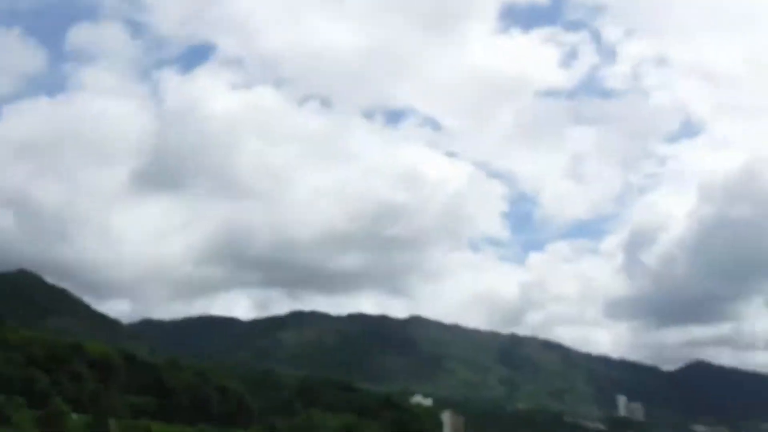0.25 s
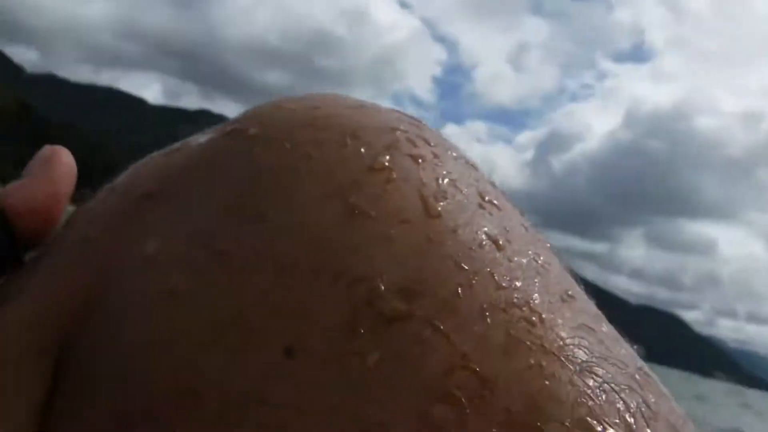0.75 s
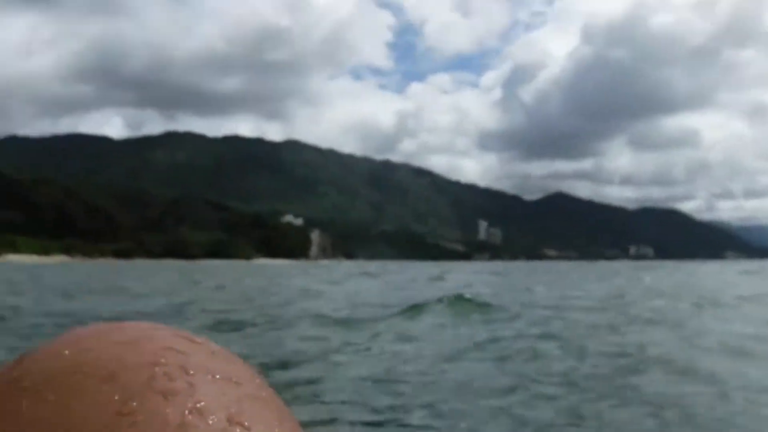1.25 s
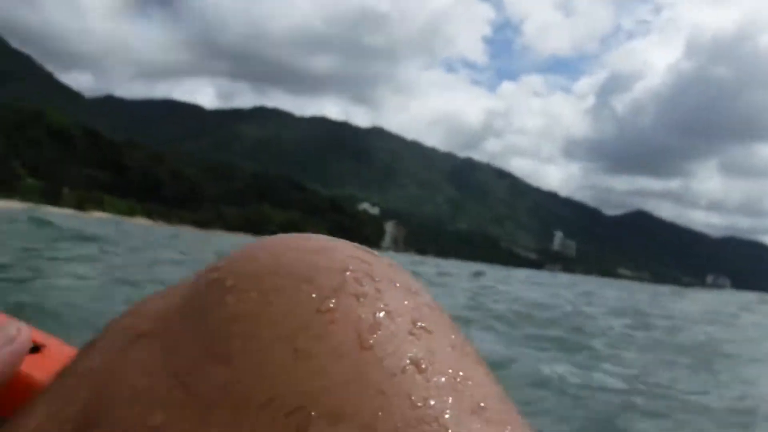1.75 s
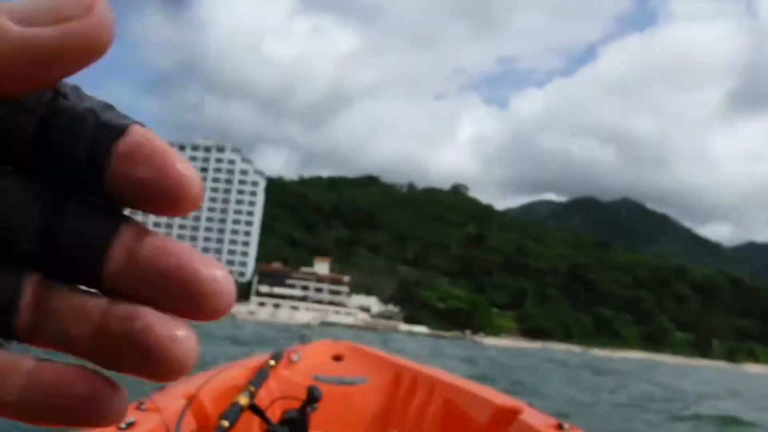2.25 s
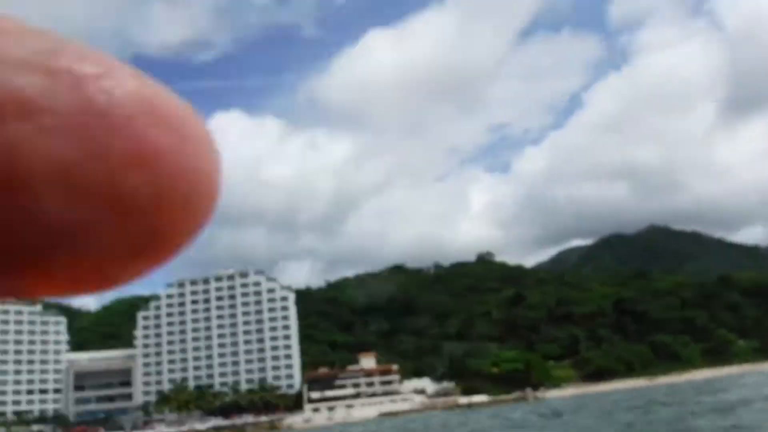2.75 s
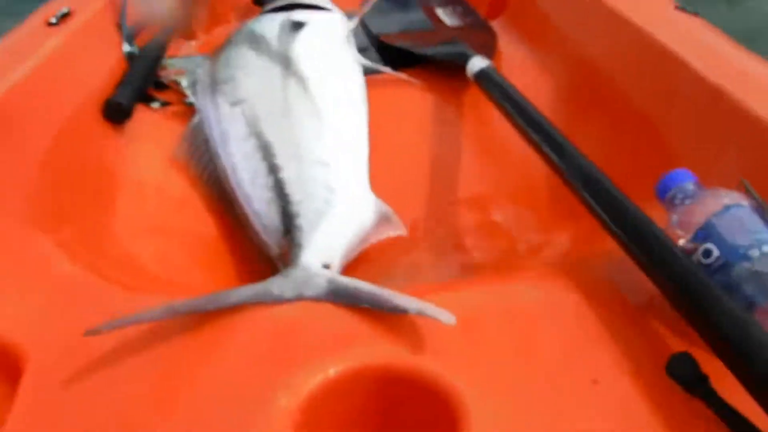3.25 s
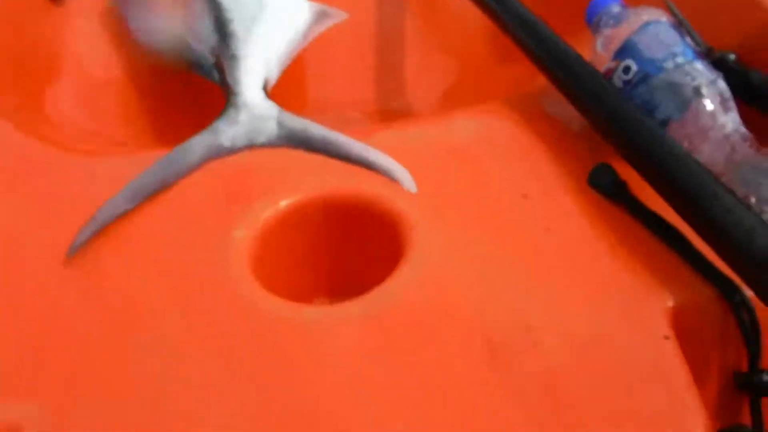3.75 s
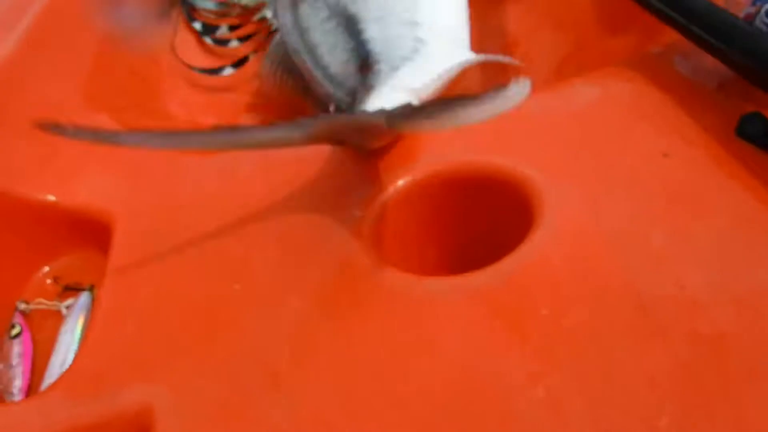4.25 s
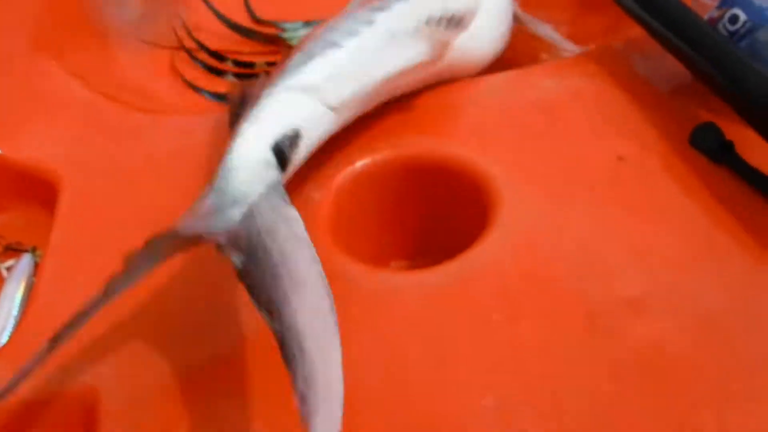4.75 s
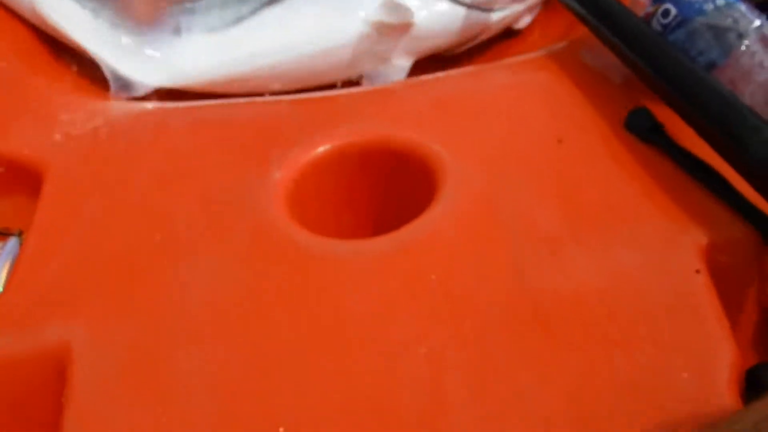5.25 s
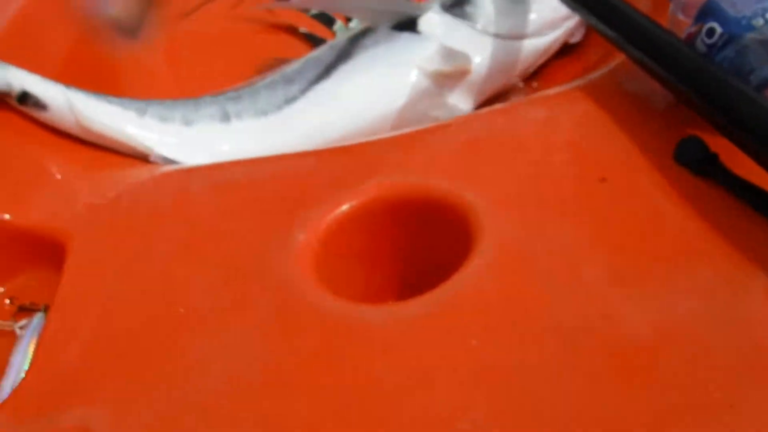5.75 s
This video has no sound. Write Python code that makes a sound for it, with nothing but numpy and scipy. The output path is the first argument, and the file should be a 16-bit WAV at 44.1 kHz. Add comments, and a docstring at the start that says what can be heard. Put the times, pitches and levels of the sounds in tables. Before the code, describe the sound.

Outdoors on open water, a close handheld microphone in a plastic case picks up soft muffled slosh, a far wash, small bubbles and low, gusty wind. Around 0.9-1.3 s a wavelet knocks the hollow kayak hull, with little glugs and a small splash. Quiet lapping continues until 2.6 s, when skin rubs the case and wind buffets low. Short, dull taps ring at 2.83 s, with ticks near 3.0 s. At about 3.15 s one very loud, deep thump shudders, rattles and distorts, leaving a short rumble. From 3.6 s a fish drags over the deck amid gritty finger rubs, a sharp tick at 3.86 s and hollow knocks, peaking in a hard double slap near 4.58 s. Another solid knock lands at 5.02 s, a lighter one at 5.39 s, then tiny wet fizzes, a tick at 5.5 s and faint rubs fade into water by 6 s.

```python
"""A hollow kayak hull knocks as wavelets slap it and a fish is dragged and dropped on its deck: struck modes.
Around it, coloured noise makes the slosh, the far wash and a light, gusty wind; damped tones make the glugs.
Fingers rub, tap and tick on a hand-held waterproof camera: gritty noise, short rings and snaps.
One heavy bump, a deep shudder with a gliding pitch, rings the case, shakes the hull and overloads the microphone."""
import sys
import numpy as np
from scipy import signal
from scipy.fft import rfft, irfft, next_fast_len
from scipy.io import wavfile
from scipy.ndimage import uniform_filter1d

SR = 44100
rng = np.random.default_rng(int(sys.argv[2]) if len(sys.argv) > 2 else 0)


def store_pcm(level_fs):
    """Save levels as 16-bit WAV."""
    pcm = np.round(np.clip(level_fs, -1, 1) * 32767).astype(np.int16)
    wavfile.write(sys.argv[1], SR, np.atleast_2d(pcm).T)


N = 265173
TIME = np.arange(N) / SR


def amp(db):
    """Decibels to gain."""
    return 10 ** (np.asarray(db) / 20)


def unit(x):
    """Scales to an rms of one."""
    return x / np.sqrt(np.mean(x ** 2) + 1e-20)


def level(curve):
    """Gain over time from rows (time [s], level [dB])."""
    return amp(np.interp(TIME, *np.transpose(curve)))


def swell(middle_s, half_s):
    """A smooth rise to one at the middle, and a smooth fall."""
    return np.exp(-((TIME - middle_s) / half_s) ** 2 / 2)


def add(mix, start_s, sound):
    """Mixes a sound in at its start time."""
    part = mix[max(round(start_s * SR), 0):][:len(sound)]
    part += sound[:len(part)]


def cut(x, hz, kind, order):
    """Low-pass or high-pass filter."""
    sos = signal.butter(order, min(hz, SR / 2 - 1), kind, fs=SR, output="sos")
    return signal.sosfilt(sos, x)


def colour(x, points, tilt_db=0):
    """Shapes x by rows (frequency [Hz], level [dB]), tilted in dB per octave, at an rms of one."""
    size = next_fast_len(len(x))
    octave = np.log2(np.fft.rfftfreq(size, 1 / SR) + 1)
    hz, db = np.transpose(points)
    gain = amp(np.interp(octave, np.log2(hz), db) + tilt_db * octave)
    return unit(irfft(rfft(x, size) * gain, size)[:len(x)])


def churn(patchy_db, size):
    """Noise whose strength drifts in patches of time (size, in 128-sample steps) and pitch."""
    real, imag, patches = rng.standard_normal((3, N // 128 + 5, 257))
    patches = uniform_filter1d(patches, size, 0)
    patches = unit(uniform_filter1d(patches, size=5, axis=1))
    spectrum = (real + 1j * imag) * amp(patchy_db * patches)
    return signal.istft(spectrum.T, nperseg=512, noverlap=384)[1][:N]


def grains(per_s, spread_db):
    """Random clicks, mostly small and a few large."""
    struck = rng.random(N) < per_s / SR
    sign = rng.choice([-1, 1], N)
    return struck * sign * amp(spread_db * np.minimum(rng.exponential(1, N), 3))


def rings(rows, rough):
    """Damped tones (time [s], level [dB], ring [Hz], rise [ms], decay [ms]); sudden ones are noisier."""
    out, t = np.zeros(N), TIME[:SR // 10]
    ms = 1000 * t
    for s, db, hz, rise, decay in rows:
        scuff = cut(rng.standard_normal(len(t)), hz / 2, "high", order=1)
        scuff = unit(cut(scuff, 0.96 * hz, "low", order=3))
        tone = np.sin(2 * np.pi * hz * t) + rough * np.exp(-rise ** 2 / 2) * scuff
        envelope = (1 - np.exp(-ms / rise)) ** 2 * np.exp(-ms / decay)
        add(out, s, amp(db) * envelope * tone)
    return out


# gusts: (strongest at [s], half length [s], level [dB])
GUST_SWELLS = [(0.082, 0.11, -37), (2.48, .22, -35.5), (3.16, .15, -33.5), (4.5, 0.6, -34.5),
               (5.7, 0.5, -42.5)]
# spectrum of wind on the microphone: (frequency [Hz], density [dB per Hz])
WIND_SPECTRUM = [(12, -14), (35, 4), (55, -2.5), (85, -2), (150, -3), (220, -6.5), (400, -39),
                 (1000, -65.5)]
# low pushes of gusts and of the grip, and the strong first push of the bump:
# (middle [s], peak [dB], pitch [Hz])
LOW_PUSHES = [(2.45, -22, 90), (2.521, -18.5, 125), (2.623, -18.5, 98.4), (2.75, -20, 102),
              (2.854, -14.5, 130), (3.125, -15, 92), (3.151, 3, 66), (3.689, -14.5, 135),
              (3.863, -11.5, 172), (3.93, -17, 146)]
BREEZE_DB, BREEZE_TILT_DB = -50, 3  # level, and tilt per octave: the breeze is less deep than the gusts


def wind():
    """Lumpy rumble of a steady breeze and its gusts, with single low pushes of gusts, grip and bump."""
    eddies = churn(patchy_db=3.0, size=10)
    gusts = sum(amp(db) * swell(s, half) for s, half, db in GUST_SWELLS)
    breeze = amp(BREEZE_DB) * colour(eddies, WIND_SPECTRUM, BREEZE_TILT_DB)
    out = breeze + gusts * colour(eddies, WIND_SPECTRUM)
    for s, db, hz in LOW_PUSHES:
        turns = np.arange(-2, 2, hz / SR)
        push = np.cos(2 * np.pi * turns) * np.exp(-(turns / 0.5) ** 2)
        add(out, s - 2 / hz, amp(db) * push)
    return out


# slosh around the hull, before its lift and lapping: (time [s], level [dB])
SLOSH_LEVEL = [(0.0, -43.5), (1.24, -40), (1.42, -44.5), (2.88, -38.5), (3.45, -45.5), (4.55, -37),
               (4.75, -39.5), (6.01, -48)]
# spectrum of the slosh: (frequency [Hz], density [dB per Hz])
SLOSH_SPECTRUM = [(40, -2), (120, -3.5), (290, 1.5), (450, -4.5), (600, -11), (800, -16.5), (1100, -18.5),
                  (1600, -21.5), (3000, -49.5), (6000, -106)]
# open sea, coloured by the microphone's membrane: (frequency [Hz], density [dB per Hz])
SEA_SPECTRUM = [(200, -3.5), (900, -7), (1130, -2), (1300, 8.5), (1460, 7), (1700, -15), (1950, -9.5),
                (2250, -24), (2650, -12.5), (3300, -26.5), (4300, -29), (5500, -86.5)]
# air pockets that wavelets trap under the hull: (time [s], level before rise and decay [dB], ring [Hz], decay [ms])
AIR_GLUGS = [(1.054, -18, 560, 2), (1.160, -17.5, 488, 14), (1.162, -18.5, 351, 13.5),
             (1.331, -24.5, 760, 2.4), (1.472, -24, 777, 5.5)]
SLOSH_LIFT_DB, SEA_DB, BUBBLES_DB = 3.0, -47.5, -56
GLUG_RISE_MS = 0.73
LAP_DB, LAP_HZ = 1.0, 7.1  # depth and fastest pace of the irregular lapping


def water():
    """Near slosh and far wash as patchy noise, ringing air pockets, and small bubbles that rise in pitch."""
    slosh = level(SLOSH_LEVEL) * colour(churn(patchy_db=0.5, size=16), SLOSH_SPECTRUM) * amp(SLOSH_LIFT_DB)
    wash = amp(SEA_DB) * colour(churn(patchy_db=1.3, size=24), SEA_SPECTRUM)
    t, bubbles = TIME[:SR // 25], np.zeros(N)
    for hz in np.geomspace(450, 2900, num=14):
        pop = np.sin(2 * np.pi * hz * t * (1 + 2 * t)) * np.exp(-hz * t / 1.8) / hz
        bubbles += signal.oaconvolve(grains(per_s=5, spread_db=5.5), pop)[:N]
    glugs = rings([(s, db, hz, GLUG_RISE_MS, decay) for s, db, hz, decay in AIR_GLUGS], rough=1.0)
    lapping = amp(LAP_DB * unit(cut(rng.standard_normal(N), LAP_HZ, "low", order=2)))
    return lapping * (slosh + wash) + glugs + amp(BUBBLES_DB) * unit(bubbles)


# beside the boat and on its wet deck: (middle [s], half length [s], level [dB], centre [Hz])
SMALL_SPLASHES = [(0.535, 0.0037, -50.5, 2570), (0.861, 0.009, -46, 2590), (0.878, 0.028, -42, 826),
                  (1.167, 0.053, -42, 514), (1.824, 0.035, -40, 520), (2.28, 0.13, -55, 1950),
                  (5.4, 0.011, -41.5, 2560), (5.478, 0.018, -44, 2330)]


def splashes():
    """Each splash is a brief, narrow-pitched cloud of tiny bubbles."""
    out, fizz = np.zeros(N), grains(per_s=2800, spread_db=9.5)
    for s, half, db, hz in SMALL_SPLASHES:
        near = abs(TIME - s) < 3 * half
        band = [(hz / 2, -22), (hz * 0.74, -2), (hz * 1.06, 0), (hz * 1.41, -19), (hz * 4, -45)]
        out[near] += amp(db) * colour(fizz[near], band) * swell(s, half)[near]
    return out


# taps, a squeak and the heavy bump, all ringing the camera case:
# (time [s], level before rise and decay [dB], ring [Hz], decay [ms])
CASE_RINGS = [(2.803, -10, 1410, 0.91), (2.830, 6, 1438, 3.96), (2.849, 1.5, 1357, 2.9),
              (2.896, -17, 1360, 2.4), (3.020, -3.5, 1200, 2.3), (3.1028, 7, 1056, 1.05),
              (3.1178, 1, 1280, 2.25), (3.137, 1, 1035, 4.4), (3.149, 24, 1196, 1.32),
              (3.1599, 30, 1102, 3.42), (3.1814, 30.5, 1588, 1.13)]
# dry ticks of plastic and fingernails, and the crack of a wavelet's knock on the hull:
# (time [s], level before decay [dB], centre [Hz])
DRY_TICKS = [(1.158, -37, 3770), (3.0213, -19, 7440), (3.022, -11, 2890), (3.089, -31.5, 7000),
             (3.136, -25, 11550), (3.248, -30, 7800), (3.258, -30.5, 3970), (3.857, -14, 8200),
             (4.3098, -36.5, 6100), (5.4923, -24, 6600)]
# strokes of skin on the case: (middle [s], half length [s], level [dB])
SKIN_RUBS = [(2.647, 0.011, -38), (2.738, 0.018, -33.5), (2.777, .006, -35.5), (2.882, 0.041, -39),
             (3.005, 0.03, -38), (3.142, 0.0045, -29.5), (3.199, 0.026, -40), (3.526, 0.012, -46.5),
             (3.599, 0.026, -34), (3.692, 0.033, -40), (3.783, 0.021, -35.5), (3.848, 0.017, -30),
             (3.994, 0.0091, -37), (4.061, .027, -38), (4.145, 0.015, -42), (4.223, .015, -40),
             (4.695, 0.017, -45), (4.863, .025, -45), (4.95, .028, -46), (5.047, 0.023, -41),
             (5.632, 0.03, -43.5), (5.75, .028, -40), (5.865, 0.014, -47)]
# spectrum of skin on the case, before any tilt: (frequency [Hz], density [dB per Hz])
SKIN_SPECTRUM = [(300, -3.5), (1300, 14), (2000, 8), (3200, 4), (4400, 3), (6600, -4.5), (8000, -11),
                 (11000, -18), (16000, -27.5)]
RING_RISE_SHARE = 0.43  # rise over decay: a soft fingertip both builds and fades slowly
TICK_DECAY_S = 0.001
RUB_TILT_DB, RUB_USUAL_DB = 1, -38  # tilt per octave of a usual stroke, and its level
RUB_TILT_PER_DB = 0.47  # harder strokes are brighter
RESTLESS_S, RESTLESS_HALF_S, RESTLESS_DB = 4.04, 1, -58  # faint creep of the grip: middle, half length, level


def case_and_fingers():
    """Skin grips and slips with a gritty hiss; taps, a squeak and the bump ring the case; ticks are dry snaps."""
    out = rings([(s, db, hz, RING_RISE_SHARE * decay, decay) for s, db, hz, decay in CASE_RINGS], rough=0.51)

    grip = amp(2.2 * unit(cut(rng.standard_normal(N), 90, "low", order=2)))
    grit = 1.03 * unit(grains(per_s=1500, spread_db=1.5))
    friction = grip * (unit(churn(patchy_db=4.0, size=12)) + grit)
    creep = colour(grains(per_s=500, spread_db=3.5), SKIN_SPECTRUM)
    out += amp(RESTLESS_DB) * swell(RESTLESS_S, RESTLESS_HALF_S) * creep
    for s, half, db in SKIN_RUBS:
        near = abs(TIME - s) < 3 * half
        stroke = np.exp(-abs((TIME[near] - s) / half) ** 2.22 / 2)
        tilt_db = RUB_TILT_DB + RUB_TILT_PER_DB * (db - RUB_USUAL_DB)
        out[near] += amp(db) * stroke * colour(friction[near], SKIN_SPECTRUM, tilt_db)

    t = TIME[:SR // 16]
    for s, db, hz in DRY_TICKS:
        band = [(hz / 4, -20), (hz * 0.8, -9), (hz, 0), (hz * 1.06, -12),
                (hz * 1.5, -20), (hz * 1.63, -11), (hz * 2, -24), (hz * 4, -44)]
        snap = colour(rng.standard_normal(len(t)), band)
        add(out, s, amp(db) * snap * np.exp(-t / TICK_DECAY_S))
    return out


BUMP_S, BUMP_DB, BUMP_RISE_S, BUMP_FALL_S = 3.1775, 19.5, 0.0135, 0.011
BUMP_SLACK_HZ, BUMP_TAUT_HZ = 133.6, 188.4  # the harder the shudder, the higher its pitch
BUMP_TAIL_DB, BUMP_TAIL_T60_S = -4.5, 0.12
RATTLE_DB, RATTLE_HZ = -1.5, 600  # the case rattles while it is shaken
RUMBLE_DB, RUMBLE_HZ, RUMBLE_T60_S = -17, 60, 0.67  # and rumbles as the grip settles


def bump():
    """A heavy blow shakes the whole camera in a short, deep shudder that rattles the case and leaves a rumble."""
    t = TIME - BUMP_S
    after = t >= 0
    force = swell(BUMP_S, np.where(t < 0, BUMP_RISE_S, BUMP_FALL_S))
    tail = after * amp(BUMP_TAIL_DB - 60 * abs(t) / BUMP_TAIL_T60_S)
    pitch_hz = BUMP_SLACK_HZ + (BUMP_TAUT_HZ - BUMP_SLACK_HZ) * force ** 0.7
    turns = np.cumsum(pitch_hz) / SR
    turns_at_bump = np.interp(BUMP_S, TIME, turns)
    shudder = (amp(BUMP_DB) * force + tail) * np.sin(2 * np.pi * (turns_at_bump - turns))
    rattle = force * amp(RATTLE_DB) * unit(cut(rng.standard_normal(N), RATTLE_HZ, "low", order=2))
    settle = swell(BUMP_S, BUMP_RISE_S) * (t < 0) + after * amp(-60 * abs(t) / RUMBLE_T60_S)
    rumble = amp(RUMBLE_DB) * settle * unit(cut(rng.standard_normal(N), RUMBLE_HZ, "low", order=3))
    return shudder + rattle + rumble


# modes of the hollow hull: (frequency [Hz], relative level [dB], t60 at a length of one [s])
HULL_MODES = [(117.4, 2.5, 0.14), (168, -20, .08), (253, 4.5, 0.051), (299, 6.5, 0.085),
              (396.3, -8.5, 0.15), (486, -17, 0.052), (612, -1.5, 0.055), (682, -2, 0.099),
              (782.4, -10, 0.13), (982, -9, 0.078), (1063, -6, 0.064), (1160, -1, 0.057),
              (1266, -2.5, 0.057), (1418, -2.5, 0.03), (1704, -3, 0.031), (1906, -9, 0.051),
              (2320, -18, 0.028), (2593, -2.5, 0.018), (3070, -35, 0.025)]


def hull_ring(length):
    """One blow on the hull; random phases mix the modes differently each time, over a short rattle."""
    t = TIME[:SR // 4]
    hz, db, t60 = np.transpose(HULL_MODES)[:, :, None]
    modes = amp(db - 60 * t / (t60 * length)) * np.sin(2 * np.pi * (hz * t + rng.random(hz.shape)))
    rattle = cut(rng.standard_normal(len(t)), 2400, "low", order=1) * amp(3 - 60 * t / (0.078 * length))
    contact = 1 - np.exp(-t / 0.00035)  # the contact takes a moment to build
    return (modes.sum(0) + rattle) * contact


def blow(low_hz, high_hz):
    """A blow that mainly moves the hull's modes between two frequencies, at a peak of one."""
    x = cut(hull_ring(length=0.72), high_hz, "low", order=3)
    x = cut(x, low_hz, "high", order=2)
    return x / abs(x).max()


# blows of wavelets, fish and tackle, and the hull shaken by the camera bump:
# (time [s], slap peak [dB], slap centre [Hz], thud peak relative to the slap [dB])
HULL_KNOCKS = [(.936, -31, 1400, -10), (1.127, -23, 304, -2), (1.149, -22, 240, -3),
               (1.159, -14.5, 1000, -0.5), (1.196, -27, 700, -8), (3.161, 2.5, 400, -5),
               (3.257, -23, 950, -17), (3.678, -16, 1240, -7.5), (3.704, -16, 1100, -25),
               (3.925, -21, 800, -6), (3.956, -23, 2300, -15), (4.211, -18.5, 1440, -11),
               (4.31, -15.5, 1140, -6), (4.391, -20.5, 1080, -10), (4.493, -22, 1000, -16),
               (4.5735, -7.5, 1080, -1), (4.586, -4, 1370, 0), (4.601, -13, 340, 6), (4.713, -24, 690, 1),
               (4.772, -32.5, 2400, -13), (5.0246, -12.5, 770, -1), (5.201, -29.5, 900, -5),
               (5.390, -20.5, 1630, -9), (5.601, -25, 1540, -27), (5.748, -28, 1500, -6)]
# pulls that slide the fish over the deck: (start [s], length [s], level [dB])
FISH_PULLS = [(3.61, 0.95, -39.5), (5.062, 0.097, -36), (5.408, 0.067, -42)]
SLAP_SPREAD = 1.34  # a slap mainly moves the modes within this factor of its centre
THUD_LOW_HZ, THUD_HIGH_HZ, THUD_LAG_S = 205, 430, 0.00248
PULL_ATTACK_S, PULL_RELEASE_S = 0.049, 0.12


def hull():
    """Each knock slaps the hull's skin, then its weight moves low modes; the sliding fish slips in tiny blows."""
    out = np.zeros(N)
    for s, db, hz, thud_db in HULL_KNOCKS:
        add(out, s, amp(db) * blow(hz / SLAP_SPREAD, hz * SLAP_SPREAD))
        add(out, s + THUD_LAG_S, amp(db + thud_db) * blow(THUD_LOW_HZ, THUD_HIGH_HZ))
    drag = np.zeros(N)
    for s, length, db in FISH_PULLS:
        attack = np.clip((TIME - s) / PULL_ATTACK_S, 0, 1)
        release = np.exp(-np.maximum(TIME - s - length, 0) / PULL_RELEASE_S)
        drag += amp(db) * attack * release
    slips = signal.oaconvolve(grains(per_s=240, spread_db=2.0), hull_ring(length=0.8))[:N]
    slips = cut(cut(slips, 380, "high", order=1), 2170, "low", order=2)
    return out + drag * unit(slips)


def scene():
    """Everything meets at one microphone."""
    return (wind() + water() + splashes() + case_and_fingers() + bump() + hull())[None]


HISS_DB = -65.5
OVERLOAD = 0.74  # largest swing that the clipping passes
EDGE_HZ = 16100  # upper band limit


def record(dry):
    """The microphone hisses and clips with a tight knee; its coupling lets flat tops sag; then the band limit."""
    hiss = colour(rng.standard_normal(N), [(500, 1.0), (5000, 8.5), (16000, 2.0)])
    x = dry + amp(HISS_DB) * hiss
    clipped = x / (1 + abs(x / OVERLOAD) ** 10) ** (1 / 10)
    coupled = cut(clipped, 22, "high", order=1)
    band_limit = signal.firwin(127, EDGE_HZ, window=("kaiser", 9), fs=SR)
    return signal.oaconvolve(coupled, band_limit[None], "same")


dry = scene()
out = record(dry)
store_pcm(out)
```